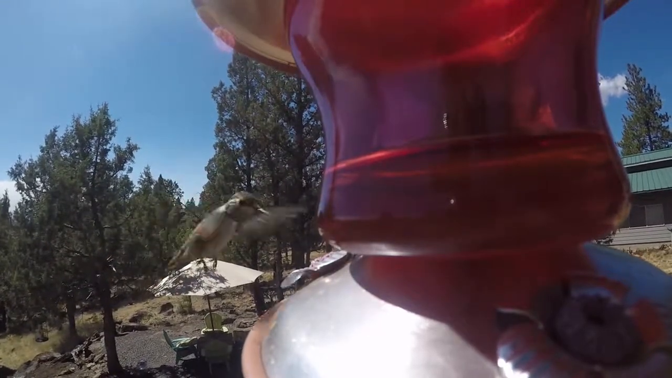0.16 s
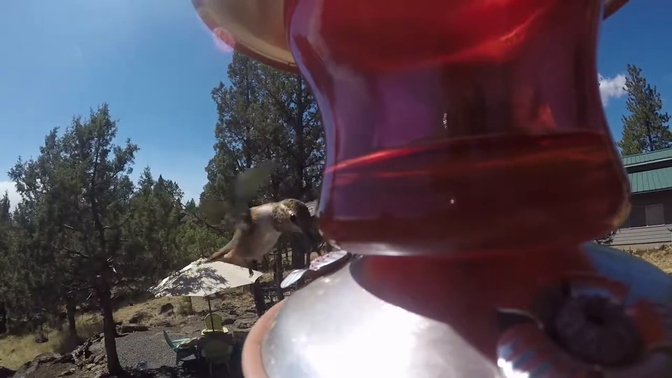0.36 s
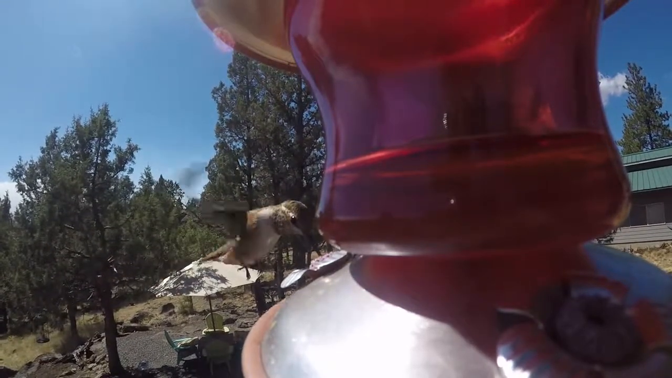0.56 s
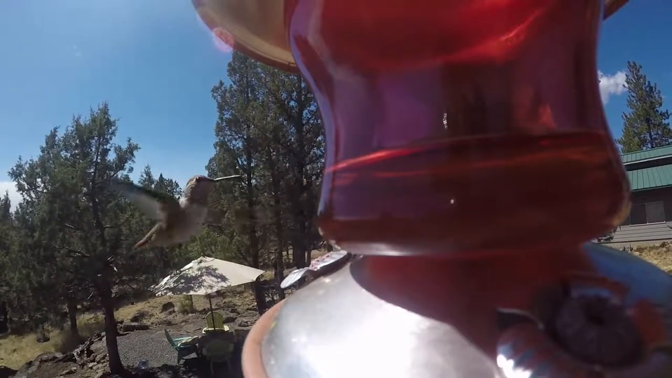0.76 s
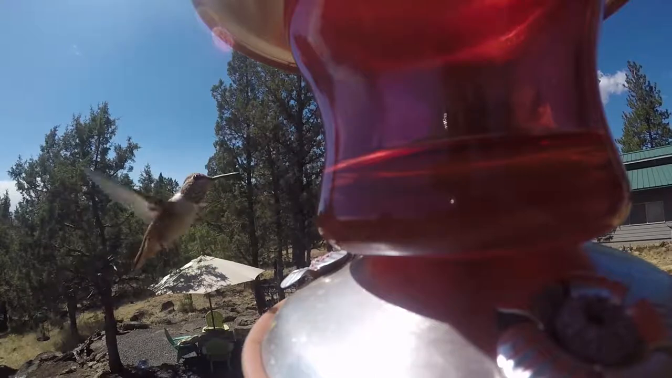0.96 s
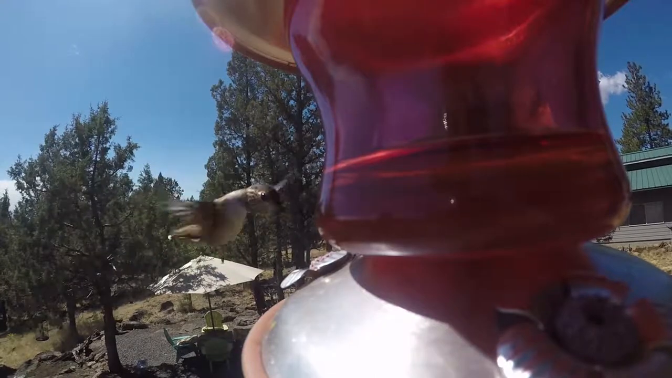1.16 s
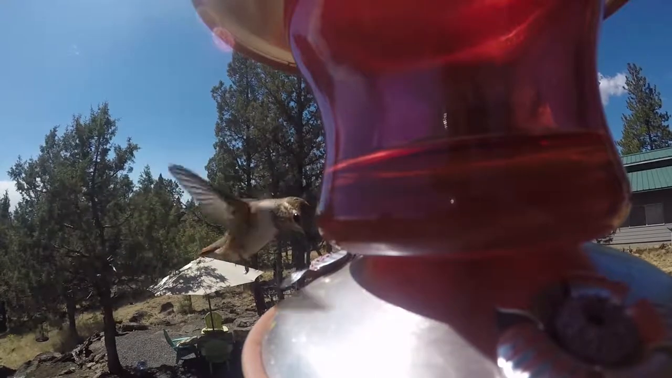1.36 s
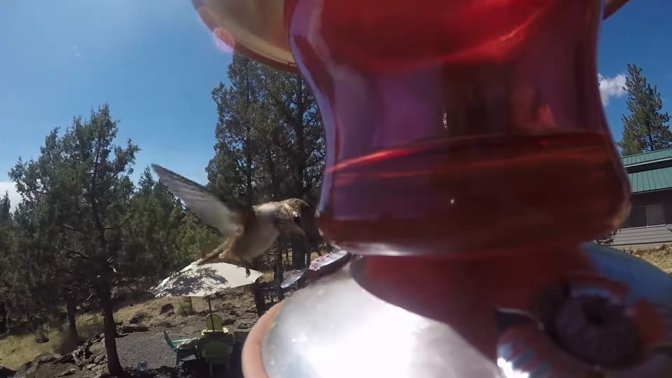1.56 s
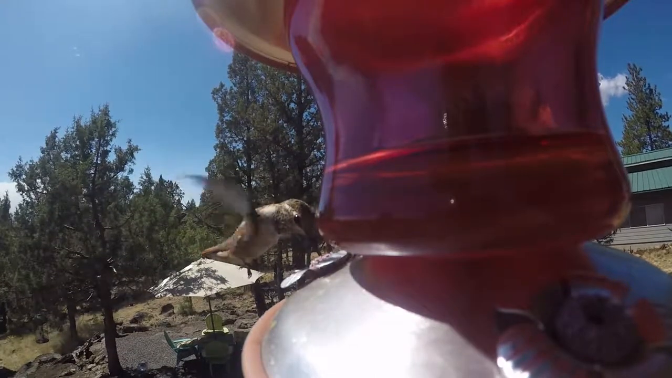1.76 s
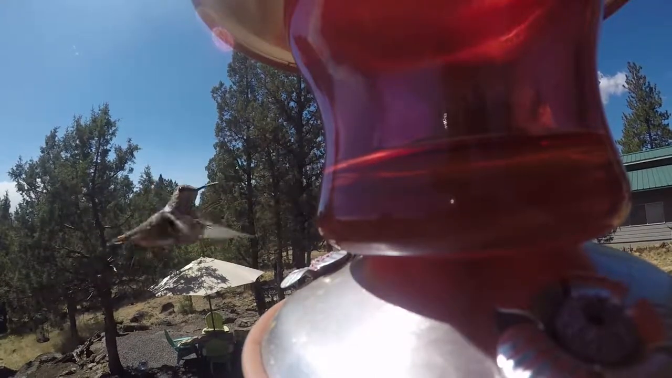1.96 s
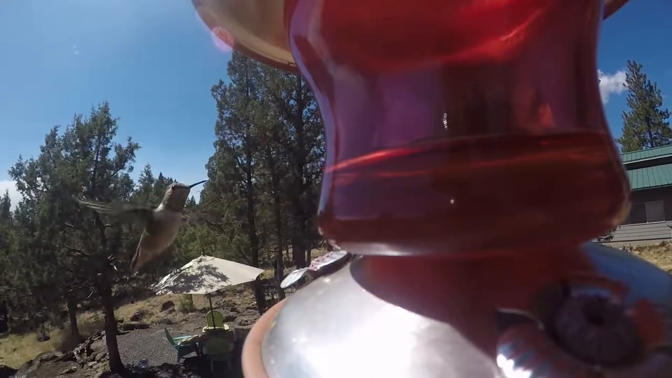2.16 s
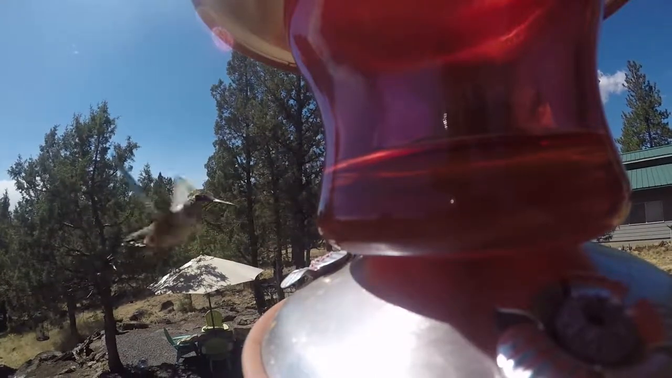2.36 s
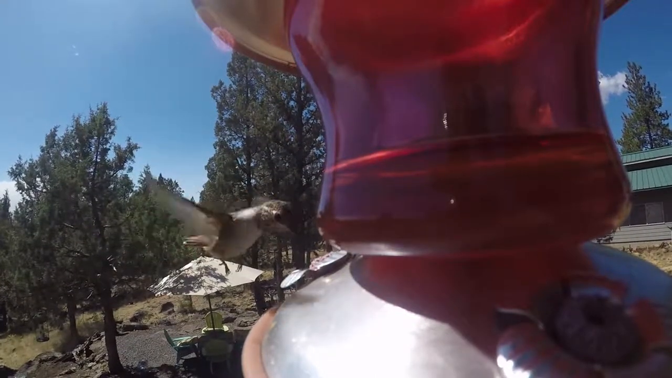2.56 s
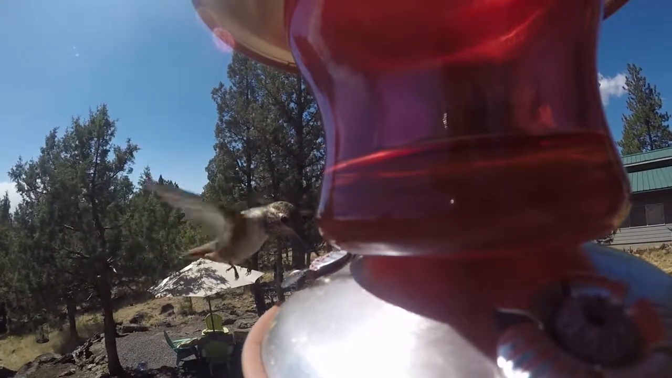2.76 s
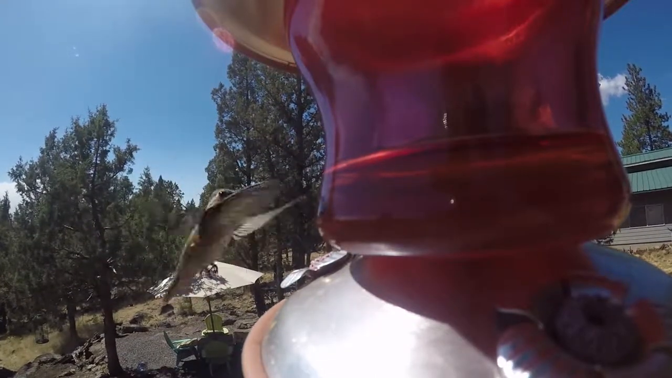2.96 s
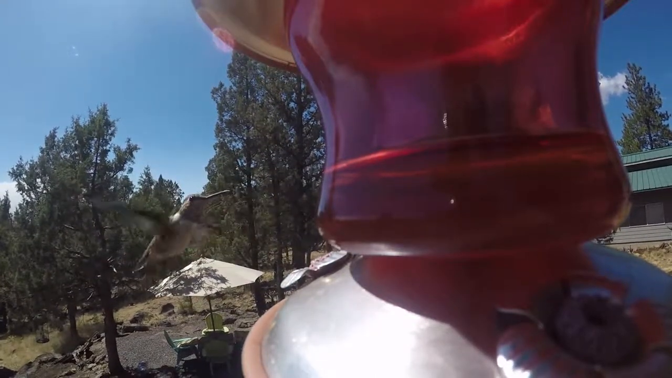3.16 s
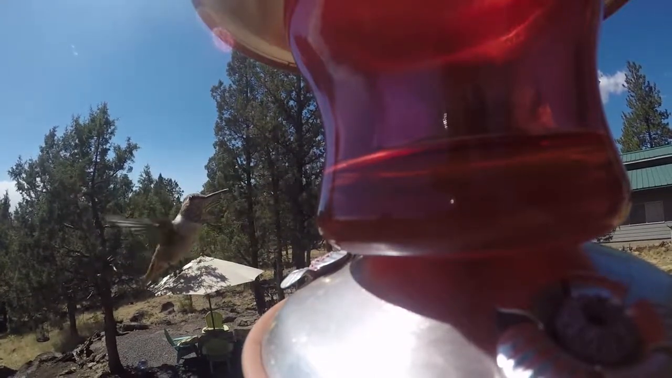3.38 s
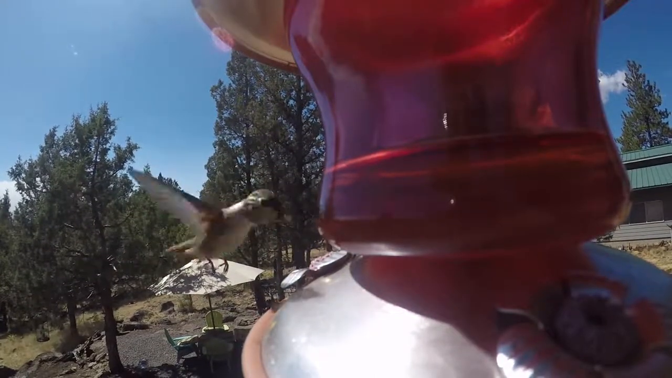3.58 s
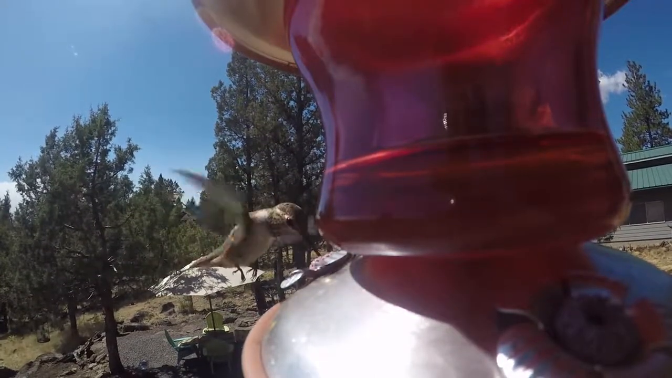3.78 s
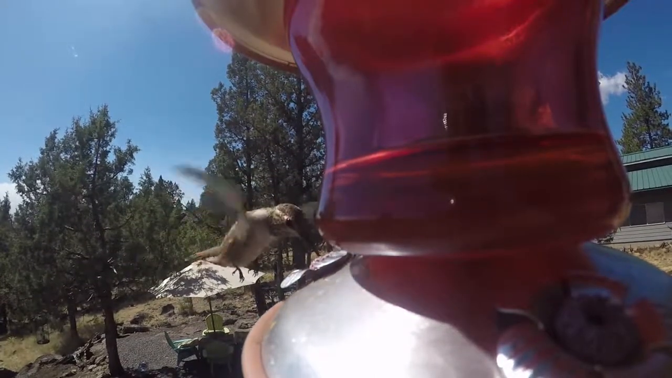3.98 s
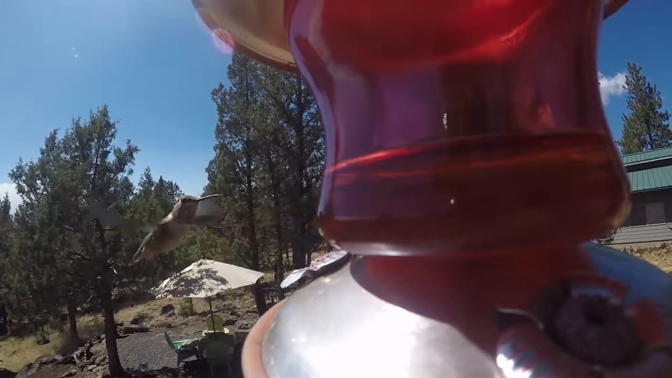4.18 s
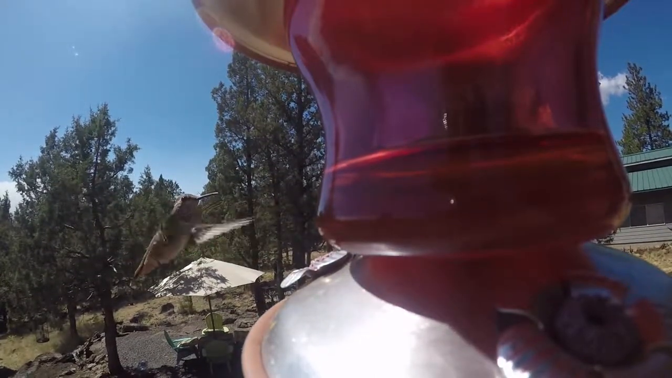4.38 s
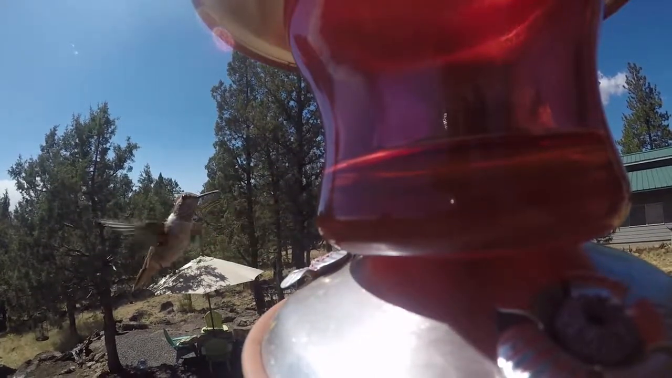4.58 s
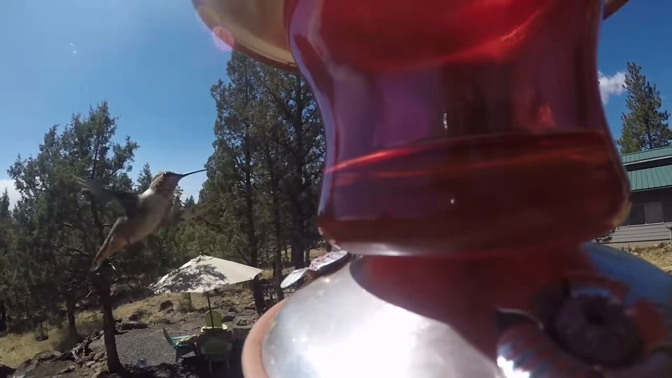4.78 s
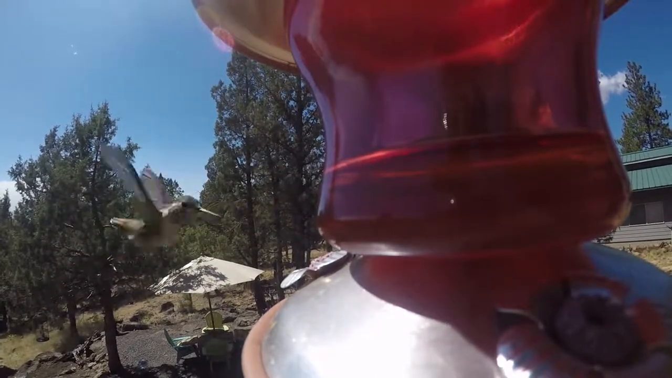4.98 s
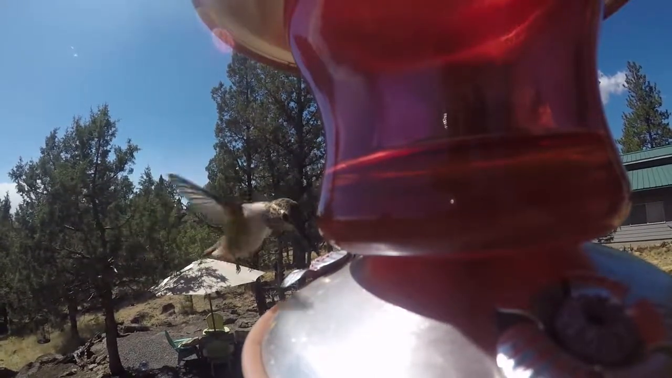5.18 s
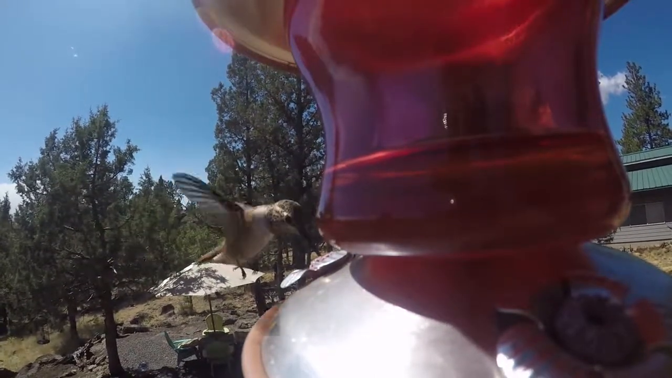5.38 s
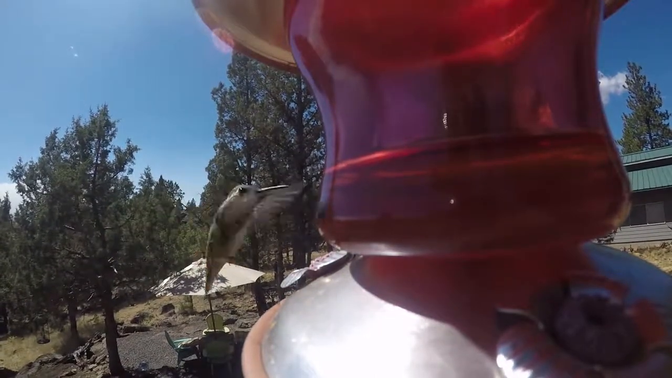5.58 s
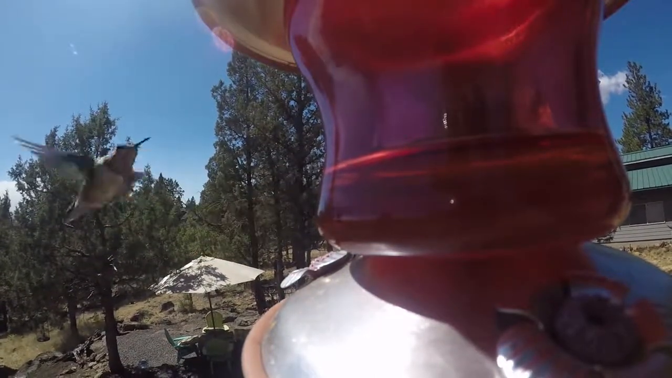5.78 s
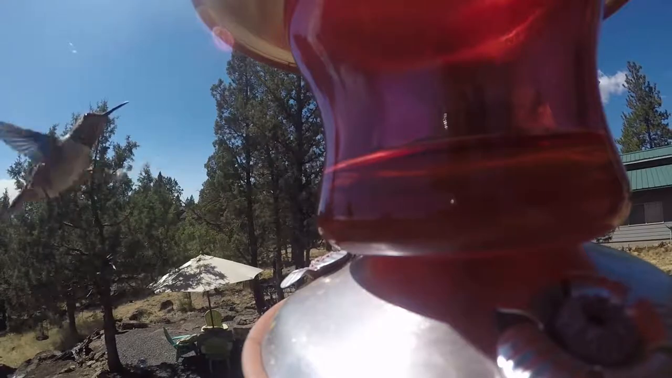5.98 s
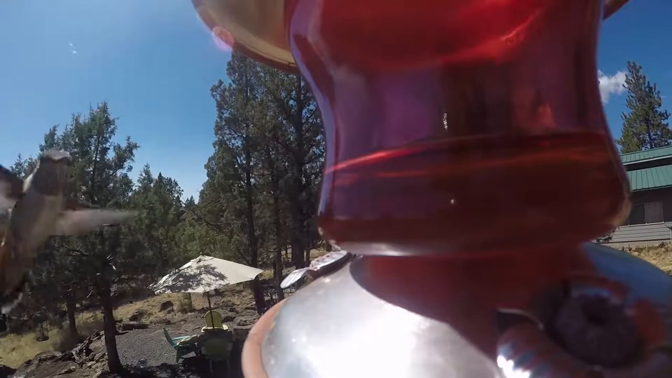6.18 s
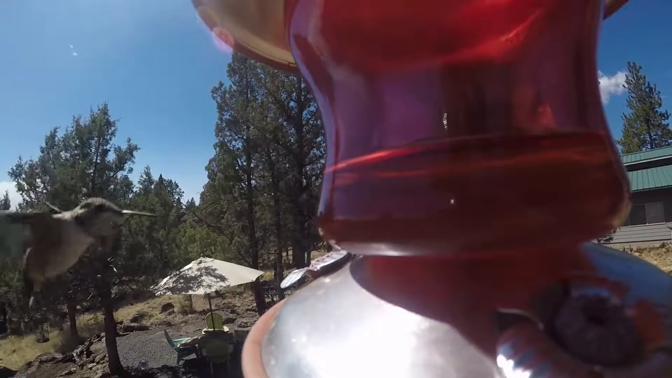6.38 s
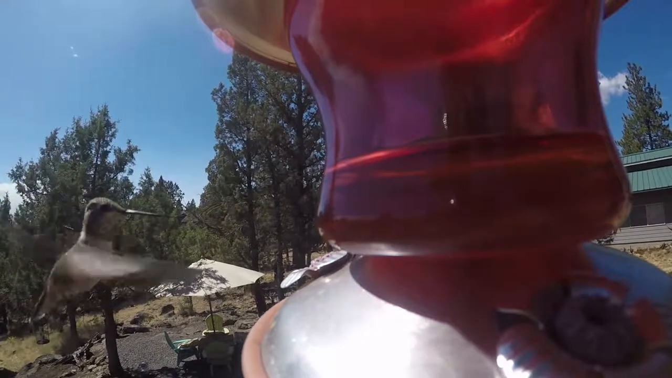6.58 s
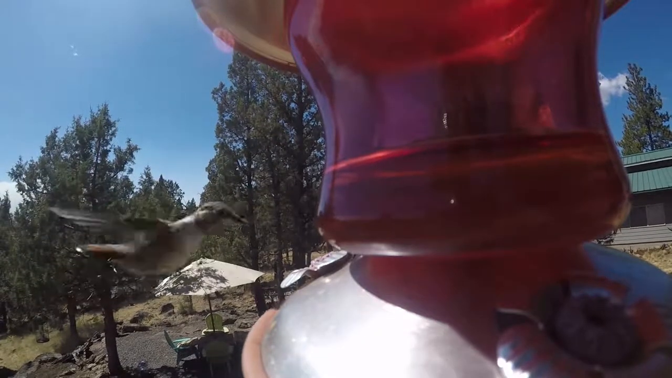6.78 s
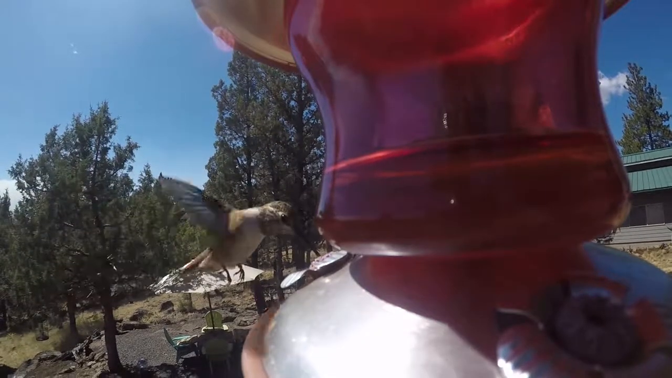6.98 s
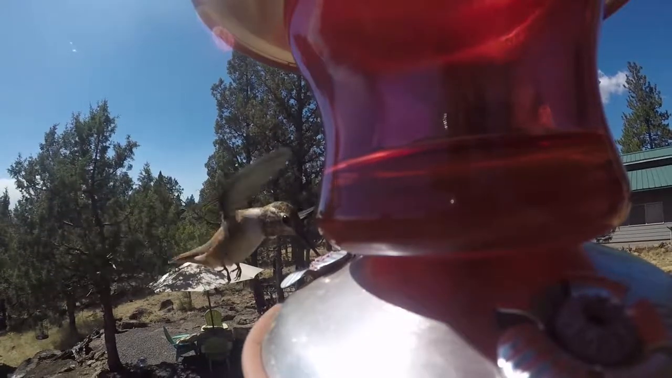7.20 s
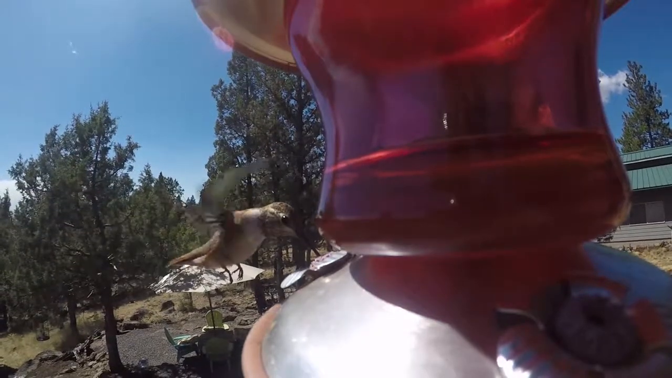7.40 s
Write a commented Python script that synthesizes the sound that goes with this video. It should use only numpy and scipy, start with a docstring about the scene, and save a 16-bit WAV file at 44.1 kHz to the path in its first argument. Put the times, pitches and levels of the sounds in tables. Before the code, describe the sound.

A hummingbird hovers right by the microphone at a plastic feeder outdoors. Its low wing hum swells each time it darts in to sip and eases as it backs off, with sharp, high chips roughly once a second. Midway it bumps the plastic, and its wings start blowing soft thumps of air onto the microphone. It swoops close past, then settles into a last loud hum. Faint air and hiss lie underneath.

```python
"""Outdoors, over quiet air, microphone hiss and a camera's thin whine, a hummingbird hovers and chips.
It darts to a plastic feeder a hand's width from the camera, brakes, sips and pushes off, five times
over, with sharp falling chips between sips. Each wingbeat is a suction pulse on a smooth hum, and close
in the beats ring the feeder. Midway the bird bumps the plastic, and downwash starts to buffet the
microphone ports. Near the end it swoops round the camera, then settles into one last long sip."""
import sys
import numpy as np
from scipy import signal
from scipy.fft import rfft, irfft
from scipy.io import wavfile
from scipy.ndimage import uniform_filter1d

SR = 44100
rng = np.random.default_rng(int(sys.argv[2]) if len(sys.argv) > 2 else 0)


def digitize_waveform(pressure):
    """Quantize a signal to 16-bit integers and store it at the path in sys.argv[1].

    Rows of a 2-D input are taken as channels; values are limited to [-1, 1].
    """
    field = np.atleast_2d(pressure).T
    bounded = np.clip(field, -1, 1)
    quanta = np.round(bounded * 32767).astype(np.int16)
    wavfile.write(sys.argv[1], SR, quanta)


N = 328104
T = np.arange(N) / SR

# Smooth hum of the two wing strokes: beat_multiple, level_db
HUM_PARTIALS = [(2, 0), (3, -4.5), (4, -6.5)]
# Spectrum of the suction pulse as the wings flip: frequency_hz, harmonic_level_db
SNAP_SPECTRUM = [(230, -4.5), (290, -3.5), (350, -11), (420, -13), (520, -21.5), (650, -34.5), (900, -35),
                 (1300, -42)]
# Air torn by the feathers: frequency_hz, density_db
SWISH_SPECTRUM = [(100, -28), (300, 10), (700, 0), (1100, 1), (1800, -7.5), (3300, -11), (4700, -21.5),
                  (7000, -10.5), (10000, -38), (15000, -47)]
# Faint crisp ticks just before and after the last chip: time_s, level_db
FAINT_TICKS = [(6.731, -48.5), (6.751, -40), (6.886, -52), (7.042, -54)]
# The bird hangs back. Sway and snap are relative to the hum; pan is always left minus right:
# start_s, end_s, hum_db, sway_db, snap_db, rush_db, pan_db, settle_db, set_off_db
HOVERS = [(0.0, 0.164, -29, -6, -17.5, -53, 3, 2, -0.5),
          (0.817, 1.16, -28.5, -10.5, -18.5, -50, 3.5, -1, 0),
          (2.072, 2.409, -35, -6, -5.5, -52, 3, -9.5, -11),
          (3.12, 3.523, -38.5, -13, -7.5, -53, 4, -2.5, -3), (4.254, 4.657, -36, -3, -7, -53.5, 5, -12, 3),
          (4.702, 5.034, -34.5, -8.5, -17.5, -51.5, 1.5, -9, 1)]
# The bird brakes, sips and pushes off backwards:
# start_s, end_s, hum_db, sway_db, snap_db, rush_db, pan_db, brake_db, push_db, brake_extra_hz
SIPS = [(0.276, 0.659, -24.5, -6, -17.5, -47, 4.5, 4, 3, 3.5),
        (1.251, 1.875, -24, -7.5, -17, -45.5, 4, 3, 2, 3.5),
        (2.516, 2.934, -31, -6, -10.5, -46.5, 4, 3.5, 2.5, 2.5),
        (3.667, 4.041, -32.5, -4, -12, -46.5, 6.5, 4.5, 3.5, 3),
        (5.139, 5.569, -29.5, -0.5, -13.5, -47, 6, 1.5, 3.5, 2),
        (6.757, 7.602, -21.5, -8, -19, -46.5, 4, 2, 0, 0)]
# Away and close past the camera: time_s, beat_hz, hum_db, sway_db, snap_db, rush_db, pan_db
SWOOP_PATH = [(5.76, 45.8, -38, -4.5, -7.5, -57, 5), (5.83, 46.6, -26.5, 0, -10, -48, 2),
              (6.04, 45.3, -24.5, -8, -11.5, -61, 3.5), (6.125, 42.8, -39, 3, -15.5, -60, 14),
              (6.2, 51.8, -18, -3, -7.5, -43, 1), (6.32, 46, -21.5, 1, -11.5, -47.5, 2),
              (6.4, 48.6, -21.5, -5, -10.5, -48, 4), (6.5, 46.8, -26.5, -7, -12, -53, 6.5),
              (6.67, 47, -23, -4, -18.5, -51, 6)]
# The calls; middle and lower shape the fundamental along its fall:
# start_s, length_s, pitch_ratio, roughness, level_db, middle_db, lower_db, overtones_db, pan_db
CHIP_CALLS = [(0.17, 0.02, 0.92, .25, -21, 2.5, -7, -5.5, 9),
              (0.7414, 0.022, 1.07, 0.36, -21, -4, -1, 3, 5.5),
              (1.9493, 0.022, 1.01, 0.33, -22, -1, -2, 0.5, 6),
              (2.435, 0.02, 0.93, 0.61, -25, 6, -1.5, -1, 8),
              (3.493, 0.02, 0.97, 0.35, -22, 4.5, -3.5, -1.5, 7),
              (4.148, 0.026, 1.056, 0.67, -20.5, 1, -5, 1, 4),
              (5.0207, 0.022, 1.01, .3, -20, 0, -4, -1.5, 6.5),
              (5.6658, .022, 1.07, 0.75, -24, 3, 0, 3, 4.5),
              (6.1515, 0.024, 0.96, 0.7, -21, 7, -10.5, -2, 2.5),
              (6.7759, 0.018, 0.98, 0.3, -16.5, -9, -8, -7, 8.5)]
# The fall of one chip: length_share, pitch_hz, level_db
CHIP_CONTOUR = [(0, 8380, -19), (.06, 8244, -3), (0.14, 6560, 1.5), (0.258, 4530, -2.5), (.38, 3248, 1.5),
                (.5, 2840, -5.5), (.72, 2395, -9.5), (.92, 2026, -15), (1.12, 1660, -32.5)]
# A chip's harmonics: pitch_multiple, level_db
CHIP_PARTIALS = [(1, 3.5), (2, 3), (3, 0.5), (4, 0), (5, -9)]
# Treble response of the microphone ports towards the bird: frequency_hz, left_db, right_db
PORT_EQ = [(1520, 3, 3), (2370, -2.5, 6.5), (3560, -2.5, 6), (4120, -7, -2.5), (5040, -4.5, -3),
           (6200, 3, -1.5), (7020, -6, -3), (7860, 1.5, 3.5), (8220, -27, -6.5), (9400, -24, -2),
           (11150, -30, -11), (14700, -27, -21)]
# Resonances of the plastic feeder: pitch_hz, width_hz, level_db, pan_db
FEEDER_MODES = [(203, 11.4, 10, 0.5), (321, 68, 2.5, -6.5), (452, 41, -13, 1), (500, 10, 1, 7)]
# The bird bumps the feeder: time_s, width_s, peak_db
FEEDER_BUMPS = [(2.572, 0.012, -17.5), (3.686, 0.016, -34), (4.046, 0.01, -27)]
# The bill taps the rim of the feeding port: start_s, level_db
BILL_TAPS = [(0.507, -43.5), (6.381, -41)]
# Downwash reaches the microphone ports: time_s, width_s, left_db, right_db
DOWNWASH_PUFFS = [(3.726, 0.041, -24.5, -38), (4.496, 0.076, -32, -43), (4.646, 0.007, -17.5, -34),
                  (5.393, 0.019, -21.5, -35), (5.601, 0.022, -17.5, -31), (5.657, 0.024, -22.5, -24),
                  (5.798, 0.0036, -11, -26), (5.89, 0.067, -24.5, -26), (6.023, 0.0048, -21, -29.5),
                  (6.084, 0.04, -27, -23)]
# Outdoor air and microphone hiss: frequency_hz, mid_db_per_hz, side_db_per_hz
AIR_SPECTRUM = [(20, -70, -79), (45, -58, -55.5), (135, -59.5, -60.5), (310, -70.5, -71),
                (618, -84.5, -80.5), (890, -89.5, -77), (1950, -93.5, -91), (2880, -98, -100),
                (5140, -100, -104), (6700, -98, -96.5), (10040, -101, -101), (11260, -105, -106),
                (13100, -109, -110), (14600, -122, -122)]

USUAL_RUSH_DB = -51  # swish and feeder ring rise and fall about this air rush


def undb(db):
    """Decibels to gain."""
    return 10 ** (np.asarray(db) / 20)


def unit(x):
    """Scale to rms 1."""
    return x / np.sqrt(np.mean(x ** 2))


def pan(db):
    """Left and right gains for a level difference."""
    return undb(np.array([db, -db]) / 2).reshape(2, -1)


def eq(x, hz, db):
    """Filter by a curve through a few points."""
    bins_hz = np.maximum(np.arange(N // 2 + 1) * SR / N, 1)
    return irfft(rfft(x) * undb(np.interp(np.log(bins_hz), np.log(hz), db)), N)


def band(x, hz, width_hz):
    """A two-pole resonance with gain 1 at its centre."""
    return signal.lfilter(*signal.iirpeak(hz, hz / width_hz, fs=SR), x)


def drift(rate_hz):
    """Smooth random modulation at rms 1."""
    hold = int(SR / rate_hz)
    steps = np.repeat(rng.standard_normal(N // hold + 1), hold)[:N]
    return unit(uniform_filter1d(uniform_filter1d(steps, hold), hold))


def swell(time_s, width_s):
    """A bell-shaped envelope."""
    return np.exp(-.5 * ((T - time_s) / width_s) ** 2)


def beat_pulse(beats, width):
    """A bell on every wingbeat, its width a share of the beat."""
    return np.exp(-.5 * (((beats + .5) % 1 - .5) / width) ** 2)


def stroke(beats, k):
    """Harmonic k of a suction dip; a slight lead makes the pressure overshoot after it."""
    return -np.sqrt(2) * np.cos(2 * np.pi * k * beats + .5)


def wings(beats, beat_hz, hum_db, sway_db, snap_db, pan_db):
    """Lift swings twice a beat; once a beat the wings flip with a sharp dip in pressure."""
    tilt_db = 0.56 * (snap_db + 13)  # a harder snap brightens the hum
    hum = sum(undb(db + tilt_db * (k - 2.5) + 1.43 * drift(22)) * stroke(beats, k)
              for k, db in HUM_PARTIALS)
    power = sum(undb(db + tilt_db * (k - 3.5)) ** 2 for k, db in HUM_PARTIALS)
    sway = undb(sway_db + 0.53 * drift(14)) * stroke(beats, 0.99)  # low throb near the beat rate
    body = (hum / np.sqrt(power) + sway) * pan(pan_db)
    snap_hz, shape_db = np.transpose(SNAP_SPECTRUM)
    snap = sum(undb(np.interp(k * beat_hz, snap_hz, shape_db)) * stroke(beats, k) for k in range(5, 24))
    snap = snap * undb(snap_db + drift(50)) * pan(pan_db - 3)
    return undb(hum_db) * (body + snap)


def flight(glide_s=0.039, brake_s=.036, push_s=.045, push_lead_s=0.019, push_extra_hz=4.4):
    """The wings ease at each end of a hover, and beat harder and faster to brake and push off."""
    hover_beat_hz, sip_beat_hz = 46.12, 50.05
    stations = list(SWOOP_PATH)
    surge_db = glide_db = quicken_hz = 0
    for start, end, *sound, settle_db, set_off_db in HOVERS:
        stations += [(s, hover_beat_hz, *sound) for s in (start, end)]
        glide_db += settle_db * swell(start, glide_s) + set_off_db * swell(end, glide_s)
    for start, end, *sound, brake_db, push_db, brake_extra_hz in SIPS:
        stations += [(s, sip_beat_hz, *sound) for s in (start, end)]
        brake = swell(start, brake_s)
        surge_db += brake_db * brake + push_db * swell(end, push_s)
        quicken_hz += brake_extra_hz * brake + push_extra_hz * swell(end - push_lead_s, push_s)
    times, *columns = np.transpose(sorted(stations))
    beat_hz, hum_db, sway_db, snap_db, rush_db, pan_db = (np.interp(T, times, c) for c in columns)
    hum_db += surge_db + glide_db + 0.53 * drift(10)  # the bird never holds quite still
    beat_hz += quicken_hz + .15 * glide_db + 0.2995 * drift(14)
    snap_db += 0.9 * surge_db + 0.31 * glide_db
    rush_db += 1.27 * surge_db + 0.68 * glide_db
    return beat_hz, hum_db, sway_db, snap_db, rush_db, pan_db


def feather_swish(beats, rush_db, depth=0.49, scatter_db=2.5):
    """Turbulence off the feathers, with a crisp flick on each beat and a few faint ticks."""
    tremolo = 1 + depth * np.cos(2 * np.pi * beats)
    noise = rng.standard_normal(N) + 0.52 * rng.standard_normal((2, N))
    level_db = -56 + 0.94 * (rush_db - USUAL_RUSH_DB)
    rush = unit(eq(noise, *np.transpose(SWISH_SPECTRUM))) * tremolo * undb(level_db)
    beat_flicks = beat_pulse(beats, 0.053) * undb(rush_db - 12 + scatter_db * drift(50))
    ticks = sum(undb(db) * swell(s, 0.00079) for s, db in FAINT_TICKS)
    crisp = unit(band(rng.standard_normal(N), hz=2600, width_hz=3200))
    return rush + (beat_flicks + ticks) * crisp


def chips():
    """Each call dives about two octaves in a fiftieth of a second; some are hoarse."""
    out = np.zeros((2, N))
    share, pitch_hz, contour_db = np.transpose(CHIP_CONTOUR)
    waver, rasp = .05 * drift(1700), 3 * drift(2200)
    for start, length, ratio, rough, level_db, middle_db, lower_db, overtones_db, pan_db in CHIP_CALLS:
        span = int(start * SR) + np.arange(int(length * share[-1] * SR))
        progress = (span - span[0]) / SR / length
        hz = ratio * np.interp(progress, share, pitch_hz) * (1 + rough * waver[span])
        phase = 2 * np.pi * np.cumsum(hz) / SR
        # the fundamental may swell midway and fade as it falls
        root_db = middle_db * np.interp(progress, [.14, .24, .34], [0, 1, 0])
        root_db += lower_db * np.interp(progress, [.22, .34], [0, 1])
        tone = sum(undb(db + (overtones_db if k > 1 else root_db)) * np.sin(k * phase) * (k * hz < SR / 2)
                   for k, db in CHIP_PARTIALS)
        envelope = undb(level_db + np.interp(progress, share, contour_db) + rough * rasp[span])
        out[:, span] += tone * envelope * signal.windows.tukey(len(span), .06) * pan(pan_db)
    return out


def microphone_ports(x):
    """Each port's peaks colour the falling overtones; the right side lags by one sample."""
    hz, left_db, right_db = np.transpose(PORT_EQ)
    return np.array([eq(x[0], hz, left_db), np.roll(eq(x[1], hz, right_db), shift=1)])


def yard_reverb(x, near_t60_s=0.068, near_db=-15, far_t60_s=0.32, far_db=-32):
    """Quick scatter from the feeder and eaves, then a faint tail from the trees."""
    t = T[:SR // 2]
    decay = sum(undb(db - 60 * t / t60) * np.sqrt(2 * np.log(1000) / (t60 * SR))
                for db, t60 in [(near_db, near_t60_s), (far_db, far_t60_s)])
    return x + signal.fftconvolve(x, rng.standard_normal((2, len(t))) * decay, axes=1)[:, :N]


def feeder_body(push):
    """The plastic's modes rock the camera: the two microphone ports move in opposite senses."""
    ring = sum(undb(db) * band(push, hz, width) * pan(pan_db) for hz, width, db, pan_db in FEEDER_MODES)
    return ring * np.array([[-1], [1]])


def feeder_ring(beats, rush_db, ring_db=7):
    """Every wingbeat pushes on the feeder, more so the nearer the bird."""
    push = beat_pulse(beats, 0.02) * undb(1.2 * drift(50)) + .06 * rng.standard_normal(N)
    nearness_db = 1.15 * (rush_db - USUAL_RUSH_DB)
    return unit(feeder_body(push)) * undb(USUAL_RUSH_DB + ring_db + nearness_db)


def feeder_bumps(judder_hz=335, scuff_top_hz=560, lag_s=0.0004):
    """A short judder with soft scuffing rings the feeder; the right port feels it a moment later."""
    out = np.zeros((2, N))
    for time_s, width_s, peak_db in FEEDER_BUMPS:
        rub = signal.sosfilt(signal.butter(4, scuff_top_hz, fs=SR, output="sos"), rng.standard_normal(N))
        push = np.sin(2 * np.pi * judder_hz * T) + unit(np.gradient(rub))
        knock = feeder_body(push * swell(time_s, width_s) + 1e-18)
        out += undb(peak_db) * knock / np.abs(knock).max(axis=1, keepdims=True)
    return np.array([out[0], np.interp(T - lag_s, T, out[1])])


def bill_taps(tap_hz=1020, width_hz=600, decay_s=0.0087):
    """A light dry tick of the bill on plastic."""
    envelope = sum(undb(db) * (T >= s) * np.exp(-np.abs(T - s) / decay_s) for s, db in BILL_TAPS)
    noise = rng.standard_normal(N) + 0.94 * rng.standard_normal((2, N))
    return envelope * unit(band(band(noise, tap_hz, width_hz), tap_hz, width_hz * 2))


def downwash(top_hz=190):
    """Eddies hit each microphone port on their own as soft low thumps."""
    rumble = band(rng.standard_normal((2, N)), hz=60, width_hz=90)
    eddies = unit(signal.sosfilt(signal.butter(2, top_hz, fs=SR, output="sos"), rumble))
    eddies /= np.sqrt(uniform_filter1d(eddies ** 2, size=1200) + 0.069)  # evens out the level
    puffs = sum(swell(s, width) * undb([[left], [right]]) for s, width, left, right in DOWNWASH_PUFFS)
    return eddies * puffs


def air_and_hiss(air_top_hz=1200, drift_db=.7):
    """The bed: still outdoor air drifts below, even microphone hiss lies above."""
    hz, mid_db, side_db = np.transpose(AIR_SPECTRUM)
    mid, side = (eq(rng.standard_normal(N), hz, db) * np.sqrt(SR / 2) for db in (mid_db, side_db))
    bed = mid + side * np.array([[1], [-1]])
    lows = signal.sosfiltfilt(signal.butter(2, air_top_hz, fs=SR, output="sos"), bed)
    return bed + lows * (undb(drift_db * drift(3.05)) - 1)


def camera_whine(pitch_hz=8555, picture_hz=59.94, level_db=-65, pan_db=-11):
    """The camera's electronics sing in bursts, one for each picture, each at a fresh phase."""
    pictures = picture_hz * T + .03
    gate = np.sin(np.pi * (pictures % 1)) ** 4.8
    phase = rng.uniform(0, 2 * np.pi, int(pictures[-1]) + 1)[pictures.astype(int)]
    return unit(gate * np.sin(2 * np.pi * pitch_hz * T + phase)) * undb(level_db) * pan(pan_db)


def scene():
    """The flight drives wings, swish and feeder ring; calls, knocks, puffs and the bed join the mix."""
    beat_hz, hum_db, sway_db, snap_db, rush_db, pan_db = flight()
    beats = np.cumsum(beat_hz) / SR - .5 + .003 * drift(50)  # no two beats are quite alike
    bird = wings(beats, beat_hz, hum_db, sway_db, snap_db, pan_db) + feather_swish(beats, rush_db)
    calls = yard_reverb(microphone_ports(chips()))
    feeder = feeder_ring(beats, rush_db) + feeder_bumps() + bill_taps()
    return bird + calls + feeder + downwash() + air_and_hiss() + camera_whine()


def record(dry):
    """The camera cuts the top above 15 kHz."""
    return signal.sosfilt(signal.ellip(8, .2, 70, 15000, fs=SR, output="sos"), dry)


dry = scene()
out = record(dry)
digitize_waveform(out)
```